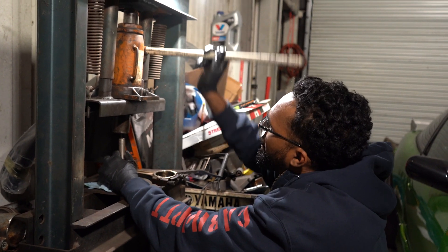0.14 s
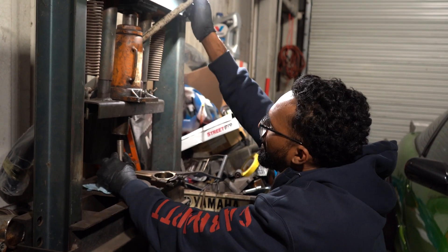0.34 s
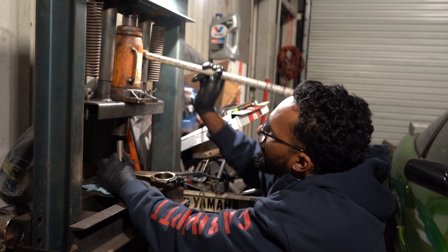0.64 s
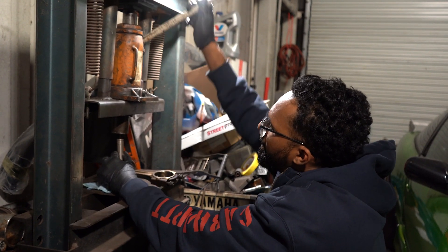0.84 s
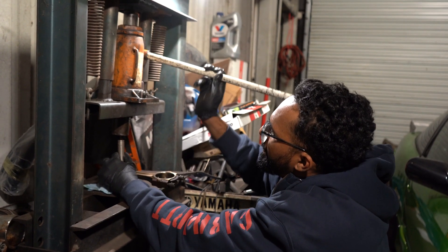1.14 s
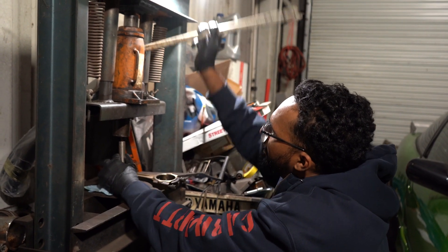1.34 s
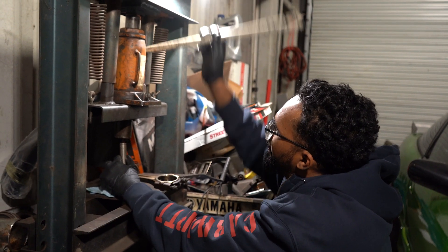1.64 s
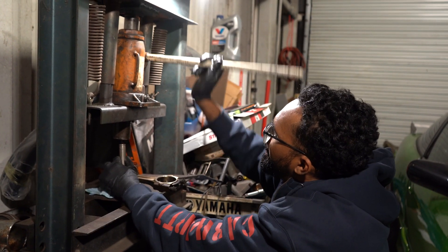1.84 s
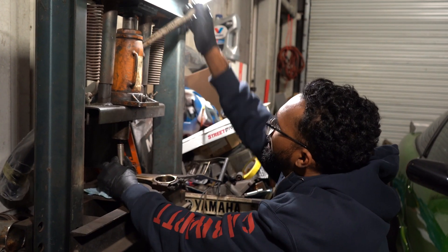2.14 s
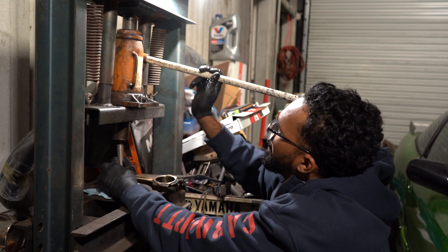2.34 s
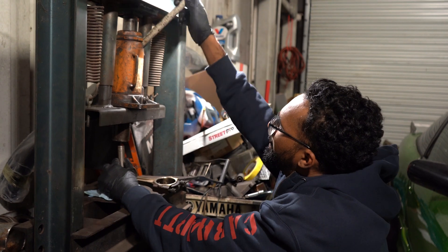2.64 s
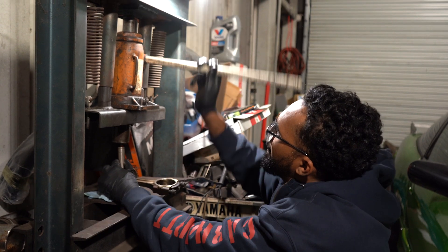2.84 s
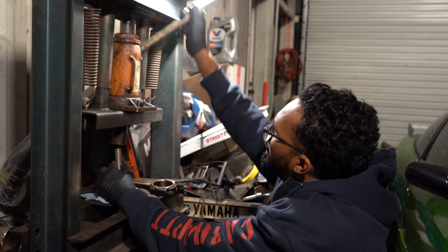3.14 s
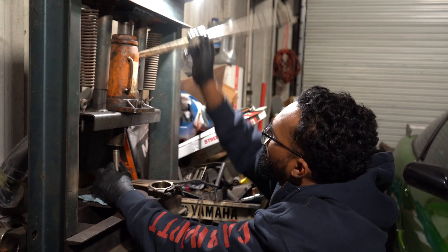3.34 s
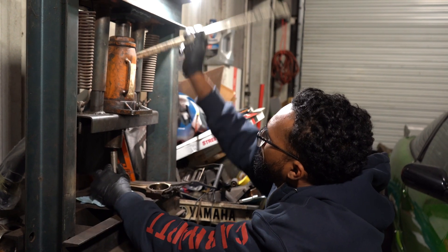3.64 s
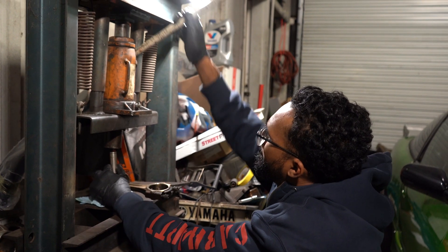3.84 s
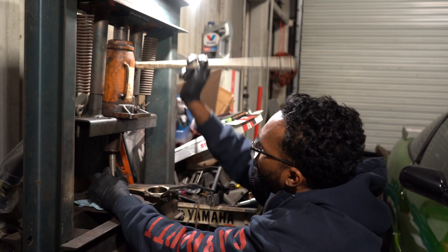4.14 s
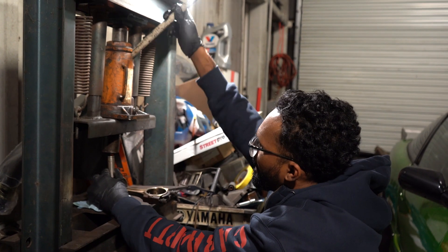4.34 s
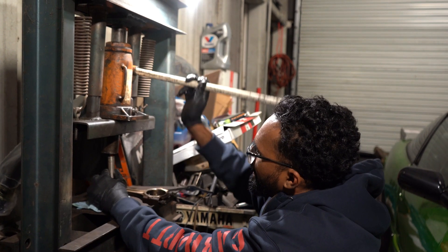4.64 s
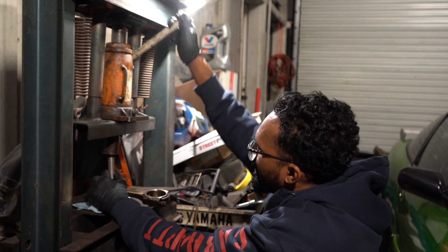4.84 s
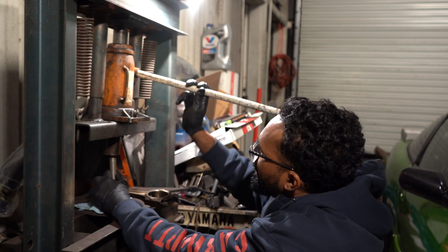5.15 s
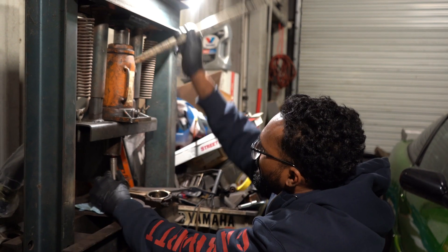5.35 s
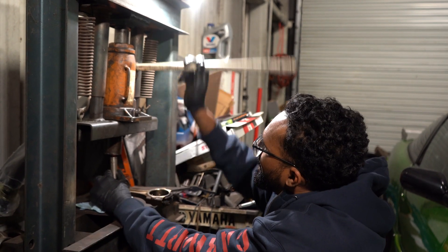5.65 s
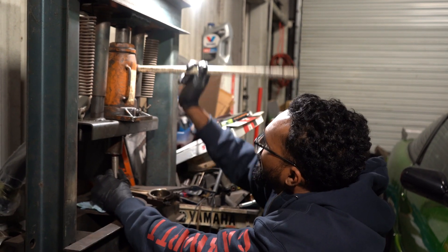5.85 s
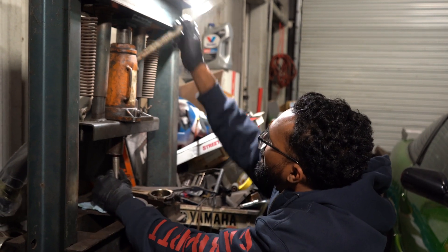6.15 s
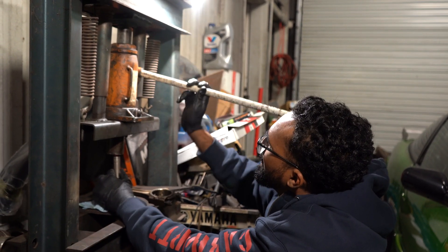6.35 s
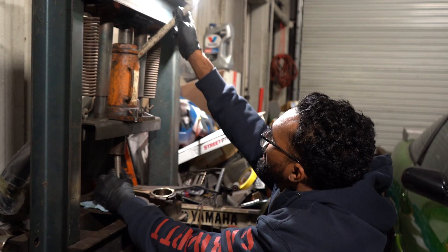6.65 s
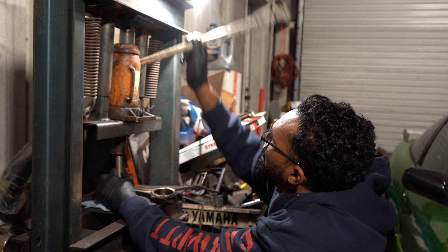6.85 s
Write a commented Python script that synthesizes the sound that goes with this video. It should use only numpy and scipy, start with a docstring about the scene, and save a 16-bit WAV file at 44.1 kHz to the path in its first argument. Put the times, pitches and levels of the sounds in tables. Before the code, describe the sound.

Close by in a garage, steel clicks and clanks repeat evenly as a jack is pumped by hand. The pipe handle clinks in its socket, the linkage knocks home and the pin ticks, then a second clink follows as the handle turns back. Small rattles and scrapes fall between them. Late on, a heavy clunk shakes the press before the last strokes. The walls answer briefly above faint room noise and a deep rumble.

```python
"""A steel link knocks home and a press frame hums: a pipe handle is pumping a bottle jack in a garage.
At each turn of the stroke the play in socket, pin and link is taken up in a short run of contacts:
the pipe rings, the linkage knocks and scrapes, the pin ticks. Late on comes one heavy clunk.
The walls answer each contact; a quiet room tone and a deep rumble lie below."""
import sys
import numpy as np
from scipy import signal
from scipy.fft import rfft, irfft
from scipy.io import wavfile

SR = 44100
rng = np.random.default_rng(int(sys.argv[2]) if len(sys.argv) > 2 else 0)


def inscribe(sig):
    """Save sig as 16-bit PCM at rate SR to the path in sys.argv[1].

    A 1-D sig is mono; a 2-D sig holds one channel per row.
    Samples are clipped to [-1, 1] before scaling.
    """
    pcm = np.round(np.clip(np.atleast_2d(sig).T, -1, 1) * 32767)
    wavfile.write(sys.argv[1], SR, pcm.astype(np.int16))


N = 307818
CENTRE_HZ = 2500   # every centre_oct counts octaves above this pitch
SHUDDER_S = 0.018   # decay of the loose parts that rattle on after every knock


def from_db(db):
    """Decibels to gain."""
    return 10 ** (np.asarray(db) / 20)


def rms_one(x):
    """Scale to rms 1."""
    return x / np.sqrt(np.mean(x ** 2) + 1e-20)


def band(x, low_hz, high_hz):
    """Gentle band-pass."""
    sos = signal.butter(2, [low_hz, min(high_hz, .47 * SR)], "band", fs=SR, output="sos")
    return signal.sosfilt(sos, x)


def ring(force, hz, t60):
    """One mode: a unit click sets a sine of height 1 ringing."""
    r, w = from_db(-60 / (t60 * SR)), 2 * np.pi * hz / SR
    return signal.lfilter([0, np.sin(w)], [1, -2 * r * np.cos(w), r * r], force + 1e-18)


def chatter(start_s, span_s, retouch, count=4):
    """Loose parts meet in a first touch and a few weaker ones: sample indices and weights."""
    is_retouch = np.arange(count) > 0
    late = rng.random((len(start_s), count)) * is_retouch
    weight = np.where(is_retouch, retouch, 1) * rng.choice([-1, 1], late.shape)
    at = (start_s[:, None] + span_s * late) * SR
    return np.clip(at.astype(int), 0, N - 1), weight


def clicks(touches, level_db):
    """The touches of all contacts as one click train."""
    at, weight = touches
    out = np.zeros(N)
    np.add.at(out, at, weight * from_db(level_db)[:, None])
    return out


def struck(modes, touches, blow_db, spread_db, detune, steps=5):
    """Blows of blow_db(hz) ring the modes; grip and joint load shift each pitch from blow to blow."""
    at, weight = touches
    scatter = rng.standard_normal((len(at), len(modes)))
    tuning = rng.integers(0, steps, scatter.shape)
    out = np.zeros(N)
    for k, (hz, mode_db, t60) in enumerate(modes):
        level_db = blow_db(hz) + mode_db + spread_db * scatter[:, k]
        for step, ratio in enumerate(np.linspace(1 - detune, 1 + detune, steps)):
            chosen = weight * (tuning[:, k:k + 1] == step)
            out += (-1) ** k * ring(clicks((at, chosen), level_db), hz * ratio, t60)
    return out


def crack(touches, level_db, low_hz, high_hz, decay_s):
    """A burst of noise that dies quickly after each touch."""
    r = np.exp(-1 / (decay_s * SR))
    envelope = signal.lfilter([1], [1, -r], np.abs(clicks(touches, level_db)) + 1e-18)
    return envelope * rms_one(band(rng.standard_normal(N), low_hz, high_hz))


def contacts(start_s, pipe, knock, tick, frame, tilt, centre_oct, focus, ping=0):
    """One column per contact. Levels in dB; ping lifts the pin's ring over the tick.
    tilt brightens the pipe (dB per octave); focus is the dB a knock loses one octave off centre."""
    rows = np.broadcast_arrays(start_s, pipe, knock, tick, frame, tilt, centre_oct, focus, tick + ping)
    return np.array(rows)


# the link knocking home: start_s, pipe_db, knock_db, tick_db, frame_db
SEAT_HITS = [(0.0, -36, -14, -33, -16.5), (0.5597, -37, -18.5, -23, -19), (1.1155, -12, -14, -21, -23.5),
             (1.7094, -8.5, -8.5, -16, -15), (2.2814, -31, -7, -23.5, -11),
             (2.8517, -6, -8.5, -15.5, -11.5), (3.4222, -3, -10.5, -12, -16.5),
             (3.9816, -4.5, -10.5, -12, -16), (4.5468, -6, -10, -11, -16), (5.1046, -22.5, -8.5, -26, -13),
             (5.677, -10, -11.5, -14.5, -13), (6.2784, -40, -15.5, -17.5, -18.5),
             (6.9242, -20, -8.5, -43, -12)]

def link_seats():
    """The link seats and takes the load; the knock sits higher when the pipe rings harder."""
    start_s, pipe, knock, tick, frame = np.transpose(SEAT_HITS)
    return contacts(start_s, pipe, knock, tick, frame, tilt=2.5, centre_oct=.36 + .018 * pipe, focus=5.6)


# modes of socket, link and jack body: pitch_hz, level_db, t60_s
LINKAGE_MODES = [(880, -7, 0.02), (1125, -3.5, 0.029), (1302, -1.5, 0.029), (1470, -0.5, 0.031),
                 (1760, -5, 0.0081), (1890, -3.5, 0.023), (2142, -0.5, 0.025), (2296, 0.5, 0.027),
                 (2528, 4.5, 0.022), (2655, 0.5, 0.035), (2872, 2.5, 0.03), (3243, 1, 0.034),
                 (3565, 3, 0.022), (3990, 0, 0.023), (4233, 0, 0.019), (4530, 5.5, 0.016),
                 (5325, -6, 0.028), (5490, -3, 0.043), (6200, -8.5, 0.01)]

def linkage_knock(touches, knock_db, pipe_db, centre_oct, focus_db):
    """A short steel knock with a noisy attack; the spot that is hit favours modes near its centre."""
    def blow_db(hz):
        return knock_db - 3 - focus_db * (np.log2(hz / CENTRE_HZ) - centre_oct) ** 2

    body = struck(LINKAGE_MODES, touches, blow_db, spread_db=1.5, detune=.04)
    attack = crack(touches, knock_db - 11.5, 640, 5580, decay_s=.0055)
    shudder = crack(touches, np.maximum(knock_db, pipe_db - 3.5) - 21, 1610, 5950, SHUDDER_S)
    return body + attack + shudder


# modes of the press frame and bed: pitch_hz, level_db, t60_s
FRAME_MODES = [(360, -17, .1), (546, -17, .12), (691, -9, .12), (730, -9, .14), (775, -10, .16),
               (830, -12, .1), (931, -14, .1), (1100, -15, .07)]

def frame_hum(touches, frame_db):
    """The heavy frame rings lower and longer than the linkage."""
    return struck(FRAME_MODES, touches, lambda hz: frame_db - 3, spread_db=2.5, detune=.015)


# bending modes of the pipe handle: pitch_hz, level_db, t60_s
PIPE_MODES = [(2116, -24, .03), (3386, -9, .035), (4904, -9, .03), (6604, -16, .028), (8473, -22, .028),
              (10420, -32, .025)]

def pipe_ring(touches, pipe_db, tilt_db):
    """The pipe clinks, damped at once by the hand."""
    def blow_db(hz):
        return pipe_db + 3 + tilt_db * np.log2(min(hz, 8000) / 4000)

    return struck(PIPE_MODES, touches, blow_db, spread_db=1.5, detune=.009)


def bright_tick(touches, tick_db):
    """The top edge of a contact: a treble snap with a faint shudder behind it."""
    snap = crack(touches, tick_db - 7, 3100, 20000, decay_s=.0023)
    return snap + crack(touches, tick_db - 24.5, 4300, 15400, SHUDDER_S)


# modes of the pin: pitch_hz, level_db, t60_s
PIN_MODES = [(7600, -9, .012), (12200, -7, .02), (15450, -13, .015)]

def pin_ping(touches, pin_db):
    """The small hard pin pings under the brightest ticks."""
    return struck(PIN_MODES, touches, lambda hz: pin_db - 4.5, spread_db=3, detune=.004)


# the garage's decay in octave bands: centre_hz, t60_s, level_db
GARAGE_BANDS = [(324, 0.47, 6), (582, 0.25, 11.5), (1270, 0.37, 5), (2300, 0.42, 0), (4140, 0.29, 5.5),
                (7540, 0.38, -4), (13700, 0.2, -1)]

def reflections(gap_s=.001):
    """A short, dense tail from walls and clutter."""
    t = np.arange(int(.7 * SR)) / SR
    tail, noise = 0, rng.standard_normal((2, len(t)))
    for k, (hz, t60, db) in enumerate(GARAGE_BANDS):
        tail += from_db(db - 60 * t / t60) * band(noise[k % 2], hz / 2 ** .5, hz * 2 ** .5)
    tail *= np.clip(t / gap_s - 1, 0, 1)
    return tail / np.sqrt(np.sum(tail ** 2))


def garage_echo(x, count=8, step_s=.11):
    """Handle and arm keep moving, so the paths to the walls change: a cycle of crossfaded tails."""
    place = np.arange(N) / SR / step_s
    wet = np.zeros(N)
    for k in range(count):
        distance = np.abs((place - k + count / 2) % count - count / 2)
        share = np.clip(1 - distance, 0, 1)
        wet += signal.fftconvolve(x * np.sqrt(share), reflections())[:N]
    return wet


# colour of the room tone: pitch_hz, relative_db
ROOM_SPECTRUM = [(60, -8.5), (107, -9.5), (300, -18), (574, -22.5), (759, -18), (1190, -29), (2500, -34),
                 (4300, -35.5), (6180, -44.5), (8000, -48.5), (14300, -56.5), (16000, -51)]
# faint hums in the room: pitch_hz, width_hz, level_db
ROOM_HUMS = [(64, 4.5, -52), (201.2, 6.5, -58.5), (772, 25, -53.5), (2590, 87, -67), (2993, 25, -67)]

def room_tone(level_db=-45):
    """A steady bed of broad noise with a few narrow resonances in it."""
    hz = np.maximum(np.arange(N // 2 + 1) * SR / N, 1)
    point_hz, point_db = np.transpose(ROOM_SPECTRUM)
    shape_db = np.interp(np.log(hz), np.log(point_hz), point_db)
    air = irfft(rfft(rng.standard_normal(N)) * from_db(shape_db) * (hz > 45), N)
    hum = sum(from_db(db) * rms_one(ring(rng.standard_normal(N), pitch_hz, 2.9 / width_hz))
              for pitch_hz, width_hz, db in ROOM_HUMS)
    return from_db(level_db) * rms_one(air) + hum


# fader ride of the rumble: time_s, level_db
RUMBLE_RIDE = [(0.05, -47), (0.09, -34), (0.67, -38), (0.7, -30.5), (1.86, -37), (2.21, -30), (2.38, -35.5),
               (3.83, -34), (3.93, -38), (4.82, -27), (4.91, -44.5), (5.14, -29), (5.78, -35), (6.4, -29.5),
               (6.48, -35), (6.98, -32)]

def deep_rumble():
    """Sub-bass noise that rises and dips."""
    level_db = np.interp(np.arange(N) / SR, *np.transpose(RUMBLE_RIDE))
    return from_db(level_db) * rms_one(band(rng.standard_normal(N), 7, 24))


def dull_thuds(rise_s=.02, fall_s=.066, floor_db=-57):
    """Low noise swells from a faint floor after each seat and clack."""
    t = np.arange(N) / SR
    thuds = [(start_s, frame_db - 20) for start_s, *_, frame_db in SEAT_HITS]
    thuds += [(start_s, thud_db) for start_s, *_, thud_db in CLACK_HITS]
    swell = np.full(N, from_db(floor_db))
    for start_s, db in thuds:
        age = np.maximum(t - start_s, 0)
        swell += from_db(db) * (1 - np.exp(-age / rise_s)) * np.exp(-age / fall_s)
    return swell * rms_one(band(rng.standard_normal(N), 180, 550))


# mid-stroke clacks: start_s, knock_db, second_touch_db, rub_db, rub_s, thud_db
CLACK_HITS = [(.1045, -24, -45, -38, .03, -52), (.6594, -15.5, -43, -20, 0.042, -30),
              (1.2096, -13, -29, -17, 0.071, -25.5), (2.966, -21, -48, -40, .03, -42),
              (3.528, -18.5, -31, -23.5, 0.033, -32.5), (4.0889, -16.5, -32, -25, 0.028, -33),
              (4.6591, -17.5, -23.5, -31, 0.034, -32.5), (4.8836, -30.5, -61, -53, .02, -47),
              (5.1989, -11, -16, -22.5, .05, -23), (5.7995, -18, -31, -38, .03, -31.5),
              (5.9971, -34.5, -61, -58, 0.022, -42.5), (6.4061, -15, -24, -21, 0.055, -31.5),
              (6.6286, -29.5, -50, -50, .02, -48)]

def dull_clacks(gap_s=.013):
    """The linkage clacks in mid-stroke and touches again just after."""
    start_s, knock, second = np.transpose(CLACK_HITS)[:3]
    clack = contacts(start_s, knock + 2.8, knock, tick=2 * knock - 15, frame=knock - 4,
                     tilt=-19, centre_oct=-.6, focus=2.2)
    touch = contacts(start_s + gap_s, second - 11, second, tick=second - 24, frame=second - 9,
                     tilt=-17, centre_oct=-.3, focus=2.8)
    return np.hstack([clack, touch])


# longer rattles after a contact: start_s, end_s, start_db, end_db, centre_oct
RATTLES = [(3.427, 3.491, -30, -26.5, 0.45), (5.517, 5.626, -18, -33, -0.23),
           (5.725, 5.79, -52, -37.5, -0.065), (6.638, 6.7, -66, -41.5, 0.81)]

def steel_scrapes(grains_per_s=1500, focus_db=24.5, rub_delay_s=.018, run_up_s=.026):
    """Rough steel on steel: grains ring the linkage in rattles, after clacks and before returns."""
    rubs = [(s + rub_delay_s, s + rub_delay_s + rub_s, db, db - 24.5, -.74)
            for s, _, _, db, rub_s, _ in CLACK_HITS]
    run_ups = [(s - run_up_s, s, db - 1.5, db, .18) for s, _, _, db, _ in RETURN_HITS]
    grains = rng.standard_normal(N) * (rng.random(N) < grains_per_s / SR)
    scrape = np.zeros(N)
    for hz, mode_db, t60 in LINKAGE_MODES:
        force = np.zeros(N)
        for start_s, end_s, start_db, end_db, centre_oct in RATTLES + rubs + run_ups:
            span = slice(int(start_s * SR), int(end_s * SR))
            fade_db = np.linspace(start_db, end_db, span.stop - span.start)
            force[span] += from_db(fade_db - focus_db * (np.log2(hz / CENTRE_HZ) - centre_oct) ** 2)
        scrape += ring(force * grains * from_db(mode_db - 9.5), hz, t60)
    # the force at the highest mode is the finest grit, heard as a thin hiss
    return scrape + from_db(-14.5) * band(force * grains, 5500, 14000)


# the link going slack: start_s, knock_db, tick_db
SLACK_HITS = [(.181, -25, -42), (0.739, -30, -54), (0.747, -20.5, -34), (1.317, -23, -36),
              (1.8975, -18, -49), (2.487, -26, -37), (3.031, -22, -25), (3.056, -23, -31),
              (3.5914, -25, -35), (3.944, -31, -46), (4.16, -31, -29), (4.7357, -32, -56.5),
              (4.7424, -28, -27), (5.2737, -27, -42.5), (5.6465, -27, -50), (5.8624, -23.5, -56.5),
              (5.8802, -19.5, -31), (6.4934, -20, -33)]

def link_slackens():
    """The link lets go with a light knock before the handle turns."""
    start_s, knock, tick = np.transpose(SLACK_HITS)
    return contacts(start_s, knock - 16, knock, tick, frame=knock - 15,
                    tilt=.1, centre_oct=-.15, focus=9.7)


# clinks at the turn of the stroke: start_s, pipe_db, tick_db, run_up_db, knock_db
RETURN_HITS = [(0.1942, 0, -18.5, -37, -15), (.762, -1.5, -26, -42, -14.5), (1.3384, -2, -13.5, -30, -15.5),
               (1.914, 1, -12.5, -44, -16.5), (2.5, 0, -28, -43, -9), (3.0611, -7.5, -30, -34, -12.5),
               (3.6223, -7.5, -24.5, -29, -11.5), (4.187, -1, -14, -26, -17),
               (4.7589, -11.5, -41, -31, -19), (5.2994, -9.5, -28.5, -40, -13),
               (5.899, -29, -40, -30.5, -18.5), (6.5014, -11, -28, -34, -15)]

def pipe_returns():
    """The pipe hits the other side of the socket; the knock sits higher with a louder tick."""
    start_s, pipe, tick, _, knock = np.transpose(RETURN_HITS)
    return contacts(start_s, pipe, knock, tick, frame=-32,
                    tilt=3.2, centre_oct=1.58 + .07 * tick, focus=6.5)


# rebounds of the pipe: start_s, pipe_db, knock_db
BOUNCE_HITS = [(0.211, -16, -23), (.7799, -21, -16), (1.3516, -14, -24), (1.9323, -28, -18.5),
               (2.519, -21, -16.5), (4.226, -17, -20.5)]

def pipe_bounces():
    """After some returns the pipe bounces once in the socket."""
    start_s, pipe, knock = np.transpose(BOUNCE_HITS)
    return contacts(start_s, pipe, knock, tick=-39.5, frame=-46, tilt=5, centre_oct=.23, focus=10)


# small chirps of the link: start_s, knock_db
CHIRP_HITS = [(.3589, -39), (1.2725, -36), (2.4723, -42.5), (3.0168, -35), (3.1549, -32), (3.7272, -35),
              (3.7851, -41), (4.275, -36), (4.5028, -34.5), (4.8287, -26), (5.3106, -42), (5.3286, -24),
              (5.9162, -52), (5.964, -23), (6.473, -35), (6.775, -49), (6.807, -44.5), (6.844, -31.5)]

def link_chirps():
    """The loose link rings a narrow cluster of modes."""
    start_s, knock = np.transpose(CHIRP_HITS)
    return contacts(start_s, knock - 18, knock, tick=knock - 14, frame=knock - 6,
                    tilt=4, centre_oct=.11, focus=39)


# clinks that open a stroke: start_s, pipe_db, graze_db
STRIKE_HITS = [(.5382, -6, -18.5), (1.0946, -6, -18.5), (1.6863, -1, -35), (2.2608, 0, -32),
               (2.8309, 1, -48), (3.396, -3, -32.5), (3.9605, -1.5, -29), (4.5242, -5.5, -22),
               (5.0822, -2, -33), (5.6548, -5.5, -31), (6.2549, -21, -35), (6.887, -16, -51.5),
               (6.914, -6, -34)]

def pipe_strikes(graze_lead_s=.005):
    """The pipe grazes the socket, then hits it; a harder strike rings brighter."""
    start_s, pipe, graze = np.transpose(STRIKE_HITS)
    strike = contacts(start_s, pipe, knock=-18 + .45 * pipe, tick=-29 + 1.1 * pipe, frame=-37.5,
                      tilt=-1.5 + np.maximum(1.5 * pipe, -12), centre_oct=.7, focus=11)
    lead_in = contacts(start_s - graze_lead_s, graze, knock=graze - 5, tick=graze - 20, frame=-50,
                       tilt=-6, centre_oct=.7, focus=11)
    return np.hstack([strike, lead_in])


# snaps of the pin: start_s, pipe_db, knock_db, tick_db, ping_db
SNAP_HITS = [(1.1092, -12.5, -18, -18, 2), (1.7, -30, -29, -32, 16), (2.843, -34, -28, -34, 10),
             (3.4119, -26, -22, -18.5, 6), (3.9727, -26, -22, -26.5, 3), (4.5394, -16, -14, -18, 9.5),
             (5.095, -10.5, -18, -19, 7), (5.6708, -3.5, -16.5, -13.5, 11.5),
             (6.2694, -37, -22.5, -17.5, -3), (6.914, -30, -32, -16.5, 13)]

def pin_snaps():
    """The pin snaps over with a bright ping."""
    start_s, pipe, knock, tick, ping = np.transpose(SNAP_HITS)
    return contacts(start_s, pipe, knock, tick, frame=knock - 9,
                    tilt=1, centre_oct=.26, focus=5.3, ping=ping)


# the clunk and its rebound: start_s, knock_db
CLUNK_HITS = [(5.5112, -5.5), (5.5431, -13.5)]

def press_clunk():
    """One heavy, dark blow in the press shakes the frame and rebounds."""
    start_s, knock = np.transpose(CLUNK_HITS)
    return contacts(start_s, knock - 9, knock, tick=knock - 30, frame=knock - 4,
                    tilt=1, centre_oct=-.51, focus=5.2)


def scene():
    """Every contact rings pipe, linkage and frame, close by, over the garage's echo and background."""
    hits = np.hstack([pipe_strikes(), pin_snaps(), link_seats(), dull_clacks(), link_slackens(),
                      pipe_returns(), pipe_bounces(), link_chirps(), press_clunk()])
    start_s, pipe_db, knock_db, tick_db, frame_db, tilt_db, centre_oct, focus_db, pin_db = hits
    tight = chatter(start_s, span_s=.002, retouch=.37)
    loose = chatter(start_s, span_s=.004, retouch=.35)
    pipe = pipe_ring(tight, pipe_db, tilt_db)
    knocks = linkage_knock(loose, knock_db, pipe_db, centre_oct, focus_db)
    ticks = bright_tick(loose, tick_db) + pin_ping(tight, pin_db)
    frame = frame_hum(tight, frame_db)
    linkage = knocks + ticks + steel_scrapes()
    direct = pipe + linkage + from_db(-3.5) * frame
    echo = garage_echo(from_db(-11.5) * pipe + from_db(-9) * linkage + from_db(-7.5) * frame)
    return (direct + echo + room_tone() + deep_rumble() + dull_thuds())[None]


def record(dry, ceiling=.9, cutoff_hz=16100):
    """The loudest contacts clip softly; a steep low-pass takes off the very top."""
    clipped = dry / (1 + np.abs(dry / ceiling) ** 8) ** (1 / 8)
    return signal.sosfilt(signal.cheby2(22, 60, cutoff_hz, fs=SR, output="sos"), clipped)


dry = scene()
out = record(dry)
inscribe(out)
```